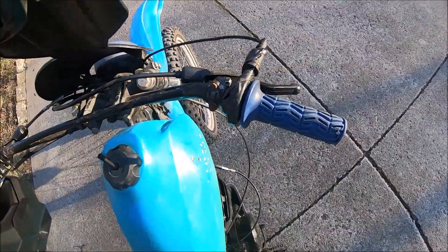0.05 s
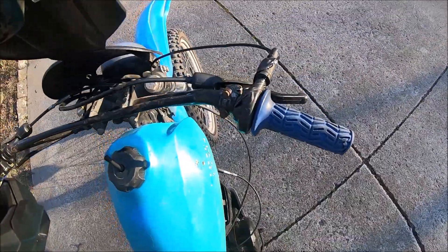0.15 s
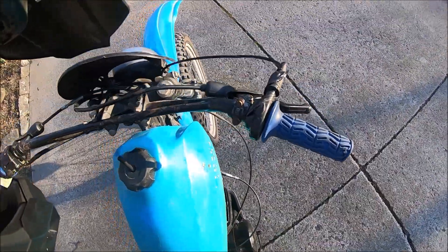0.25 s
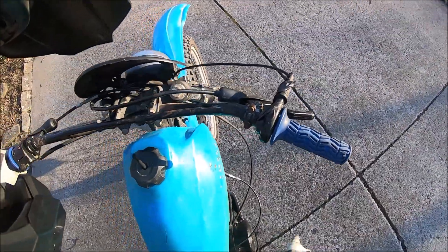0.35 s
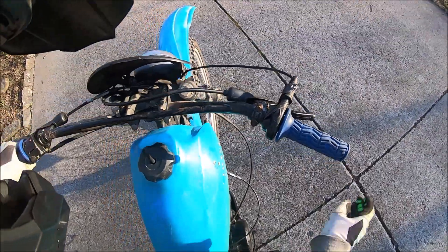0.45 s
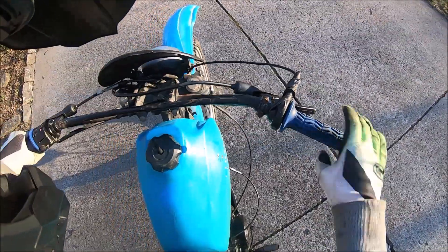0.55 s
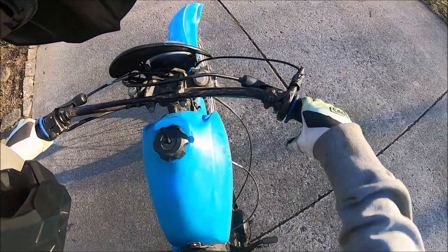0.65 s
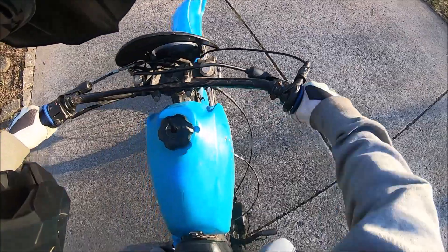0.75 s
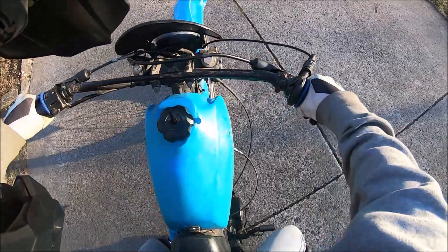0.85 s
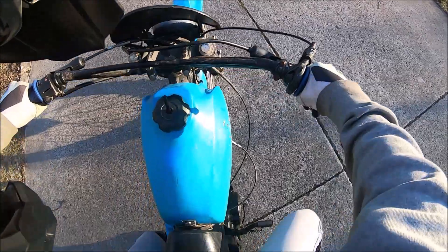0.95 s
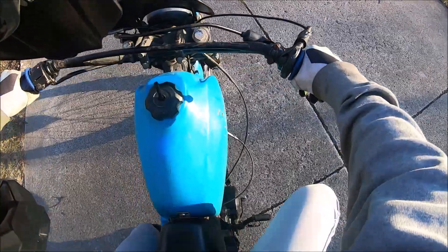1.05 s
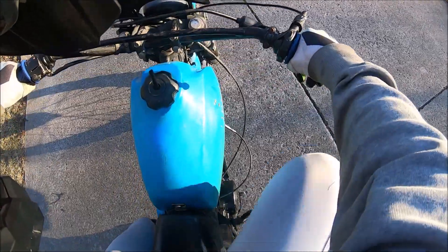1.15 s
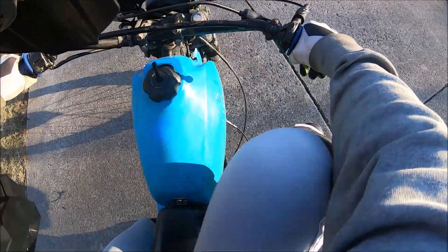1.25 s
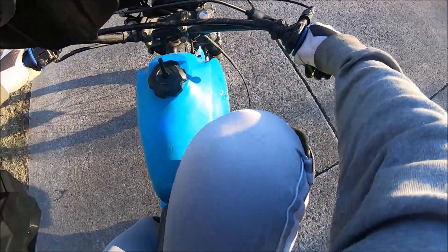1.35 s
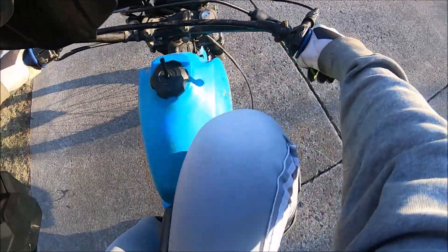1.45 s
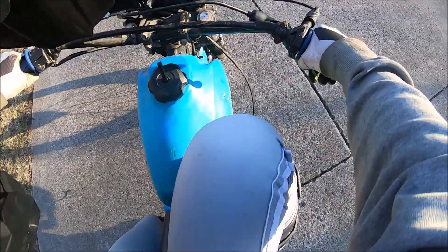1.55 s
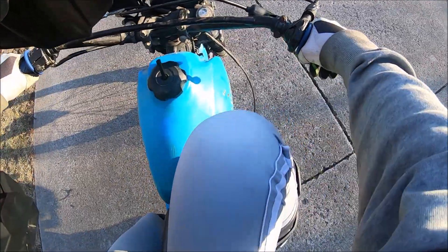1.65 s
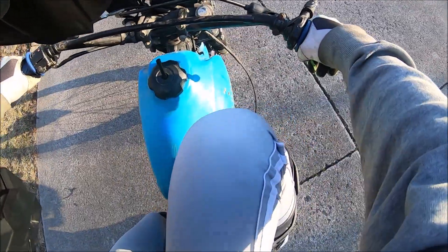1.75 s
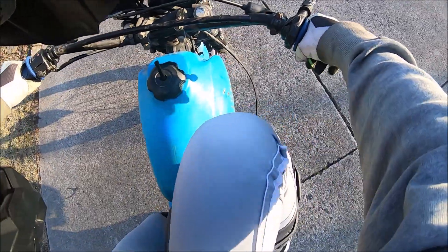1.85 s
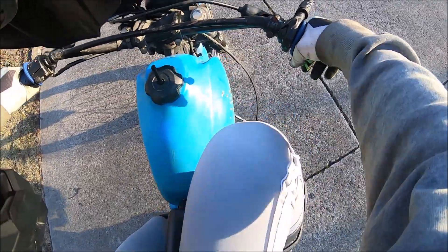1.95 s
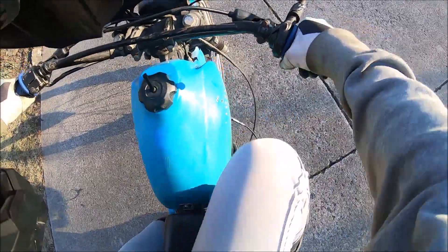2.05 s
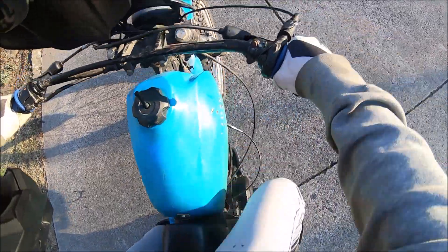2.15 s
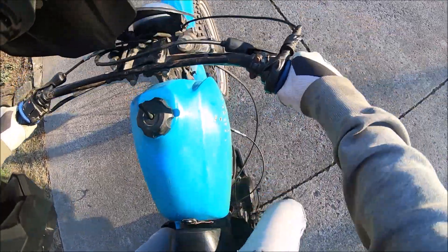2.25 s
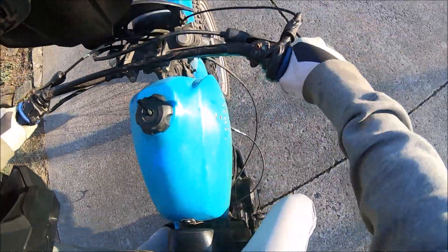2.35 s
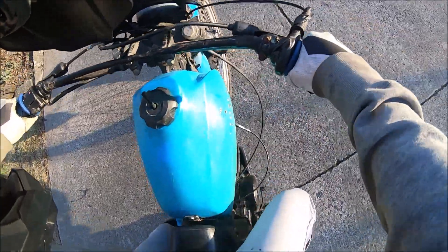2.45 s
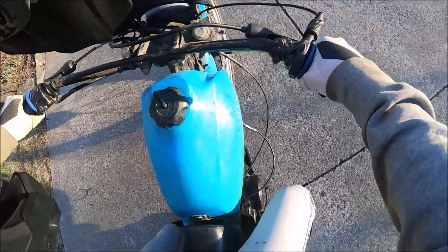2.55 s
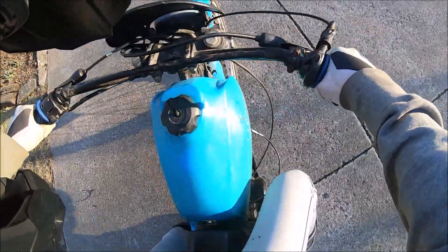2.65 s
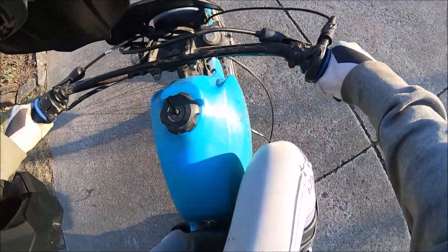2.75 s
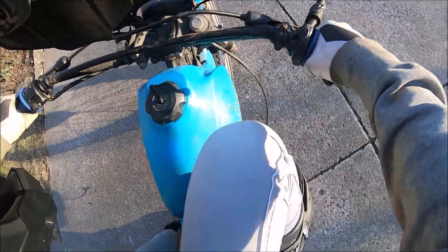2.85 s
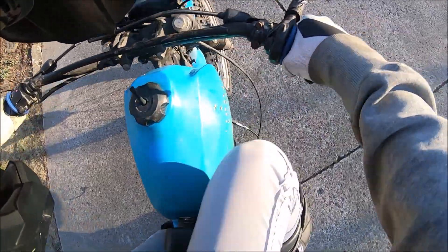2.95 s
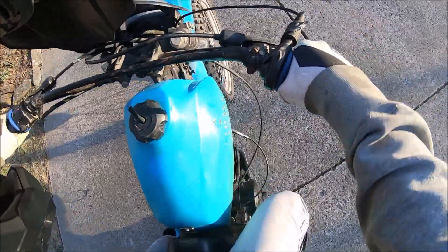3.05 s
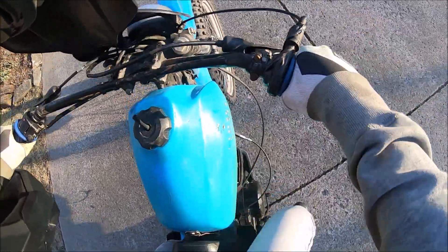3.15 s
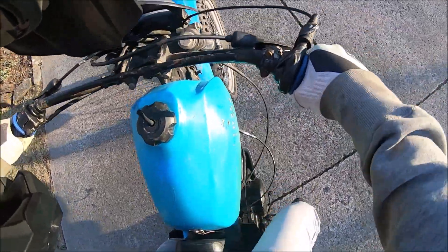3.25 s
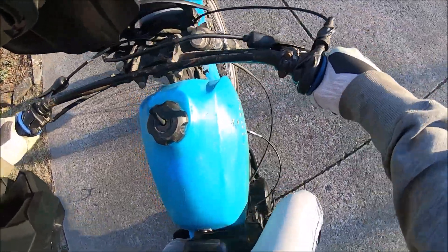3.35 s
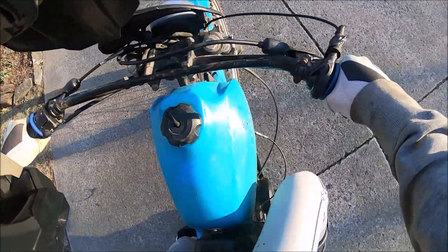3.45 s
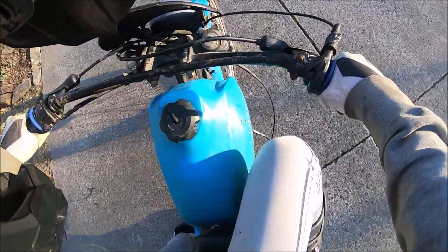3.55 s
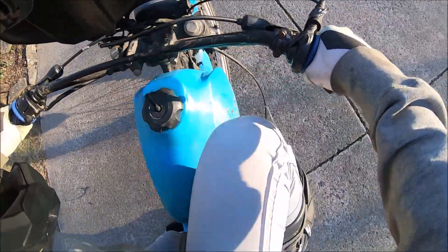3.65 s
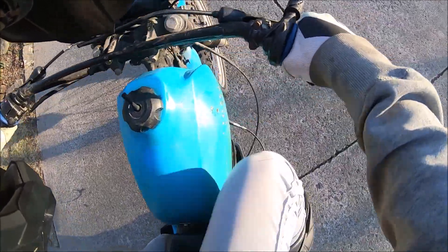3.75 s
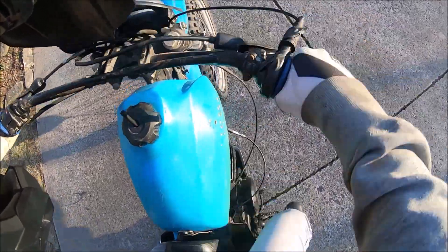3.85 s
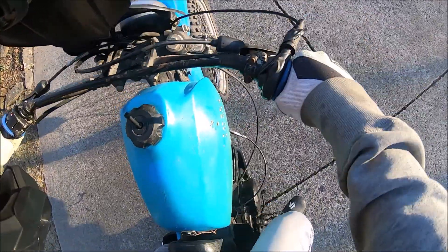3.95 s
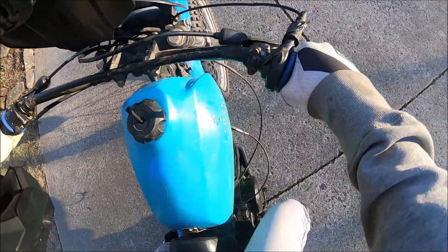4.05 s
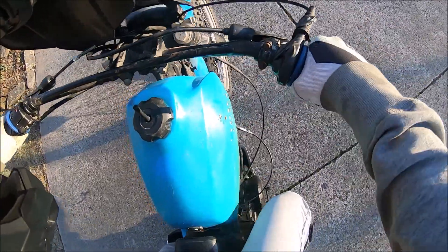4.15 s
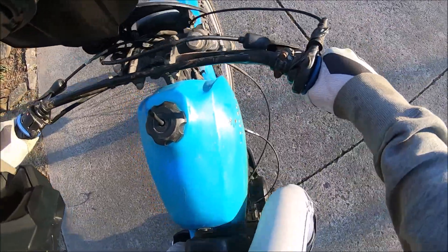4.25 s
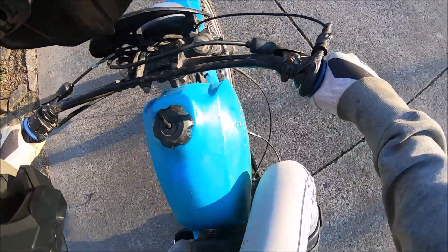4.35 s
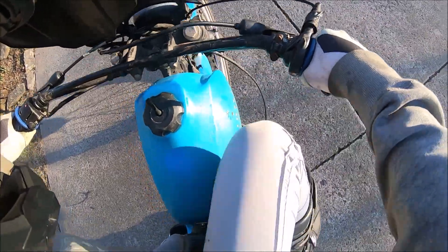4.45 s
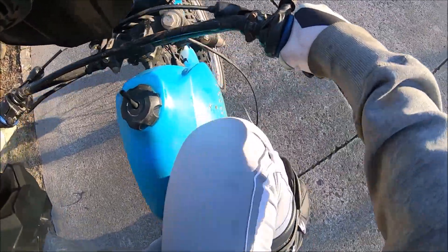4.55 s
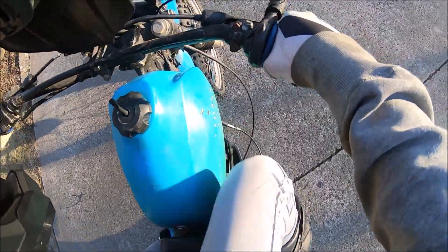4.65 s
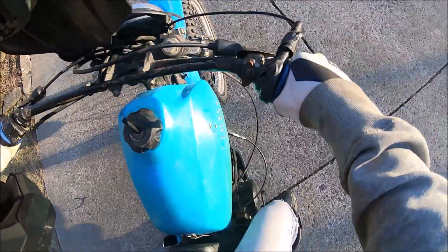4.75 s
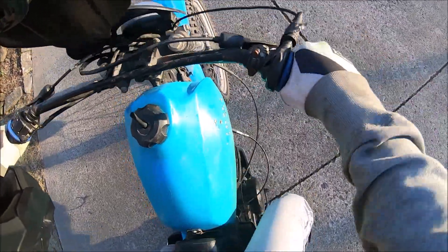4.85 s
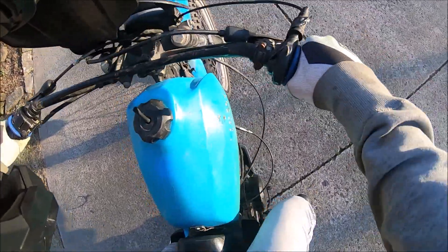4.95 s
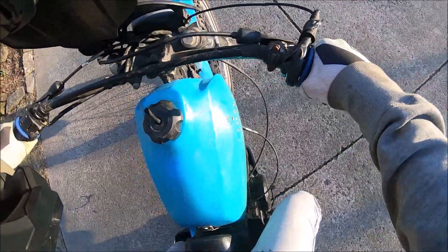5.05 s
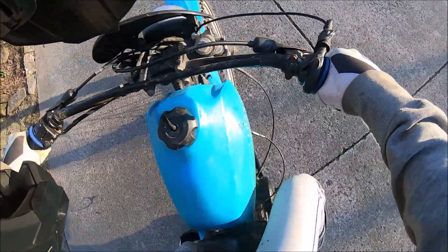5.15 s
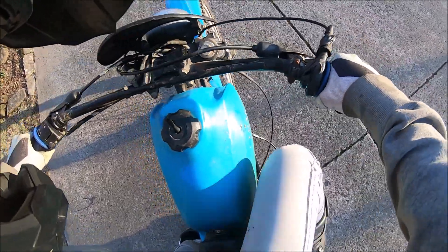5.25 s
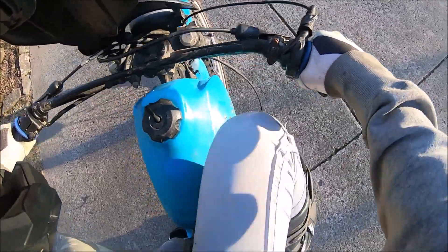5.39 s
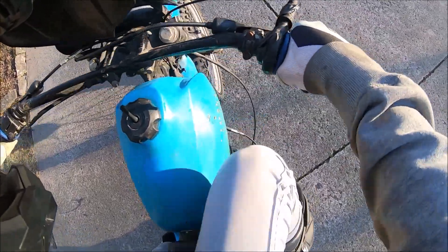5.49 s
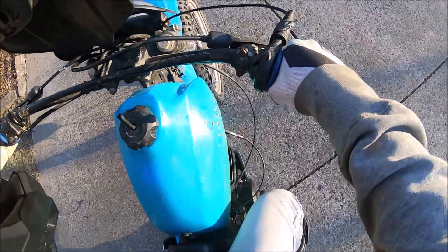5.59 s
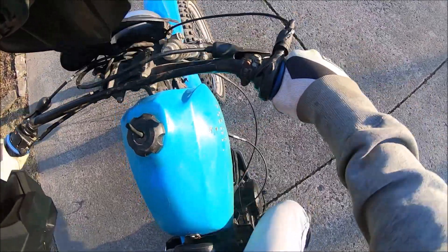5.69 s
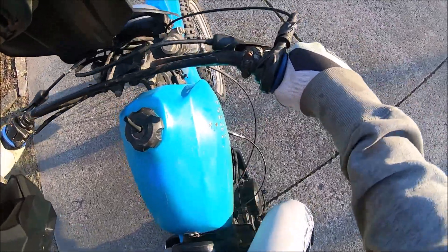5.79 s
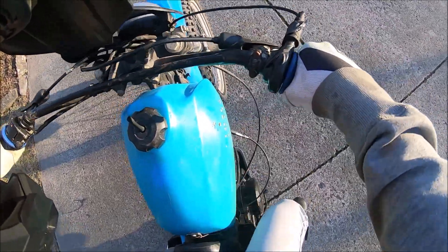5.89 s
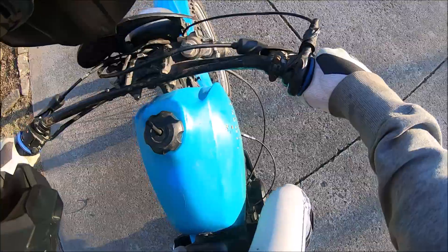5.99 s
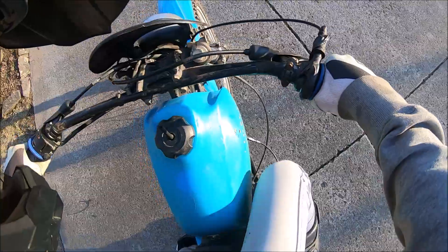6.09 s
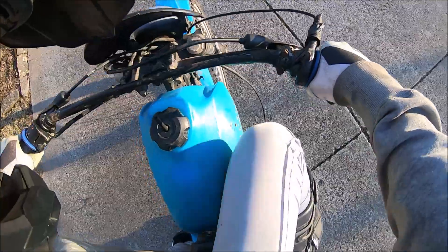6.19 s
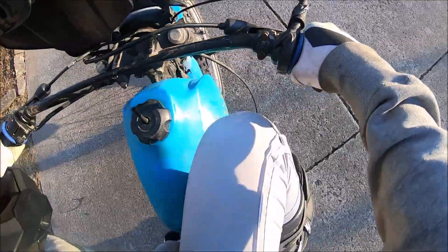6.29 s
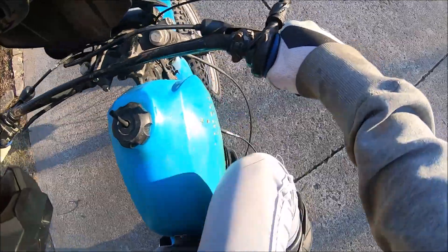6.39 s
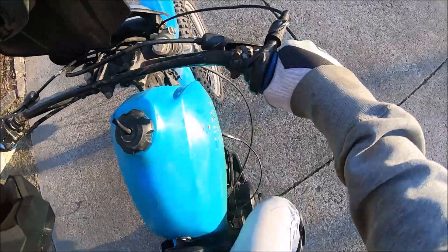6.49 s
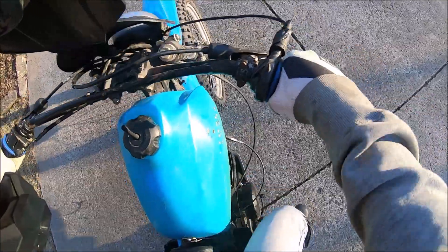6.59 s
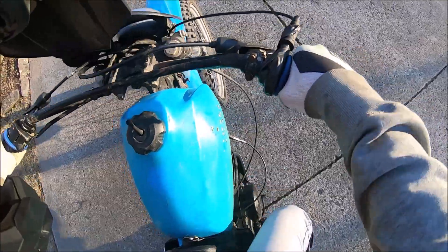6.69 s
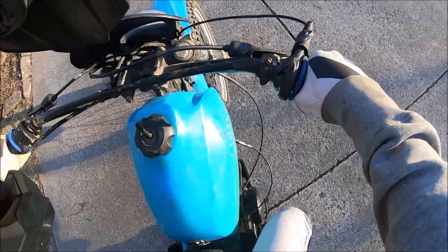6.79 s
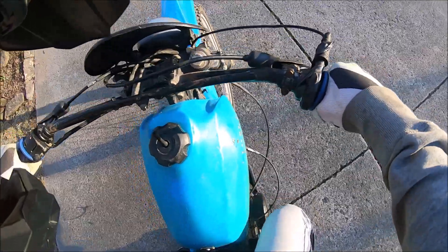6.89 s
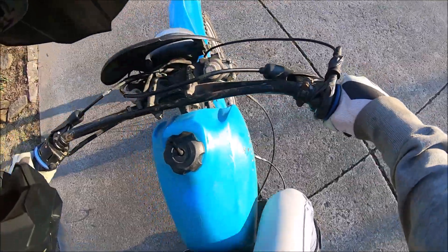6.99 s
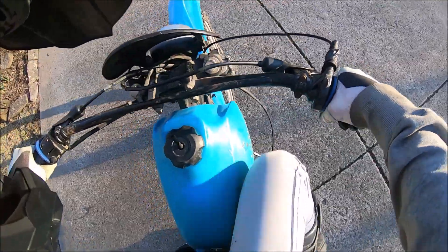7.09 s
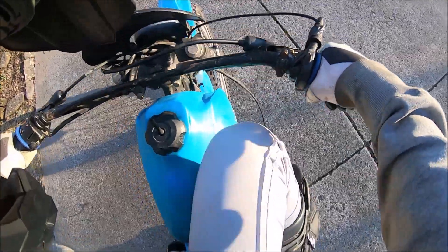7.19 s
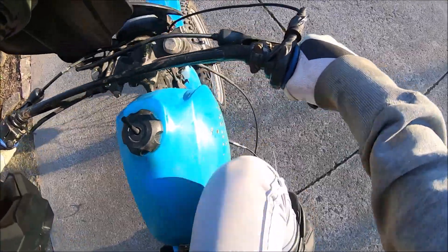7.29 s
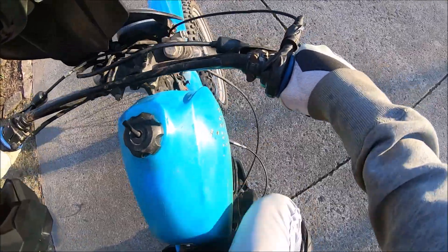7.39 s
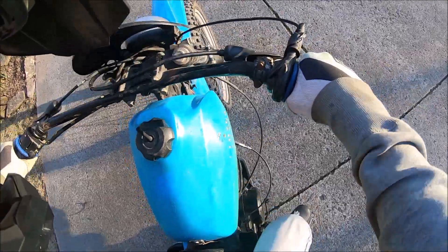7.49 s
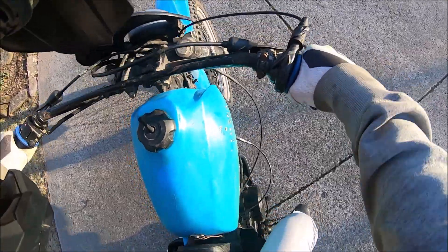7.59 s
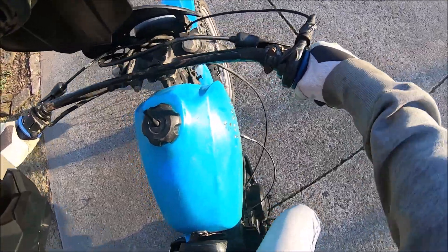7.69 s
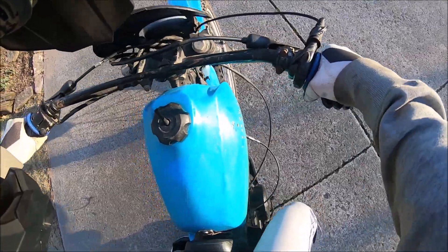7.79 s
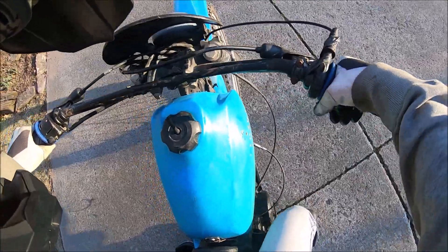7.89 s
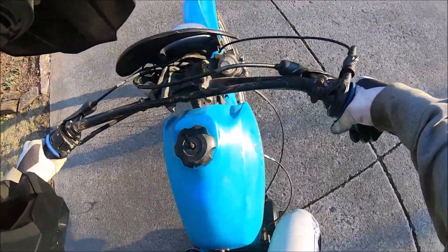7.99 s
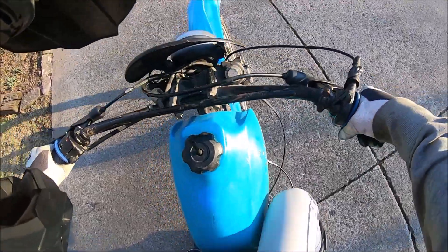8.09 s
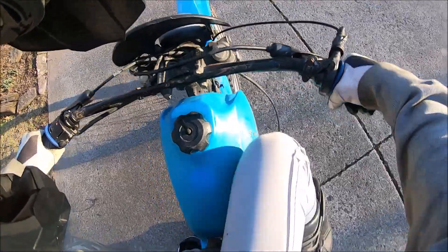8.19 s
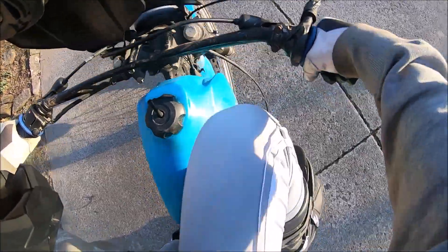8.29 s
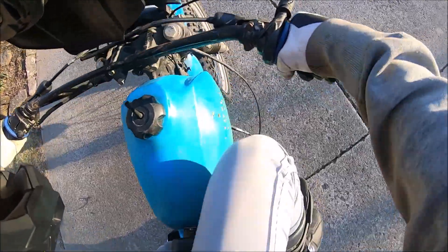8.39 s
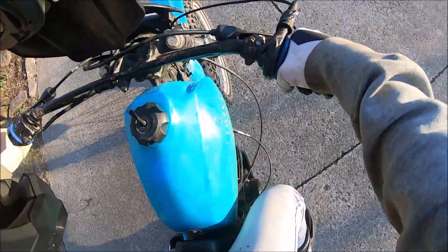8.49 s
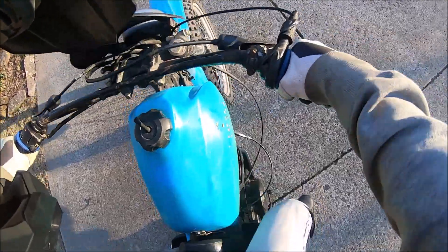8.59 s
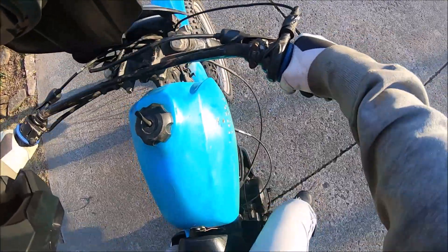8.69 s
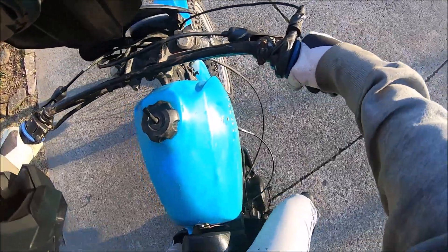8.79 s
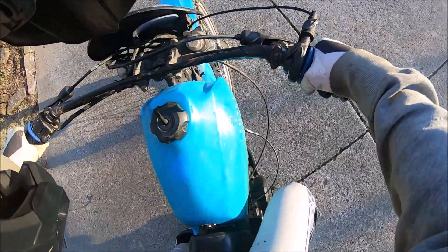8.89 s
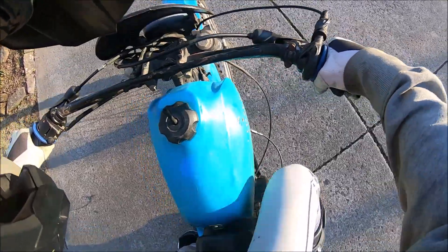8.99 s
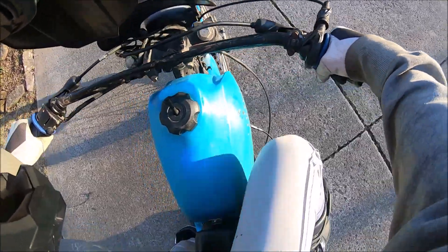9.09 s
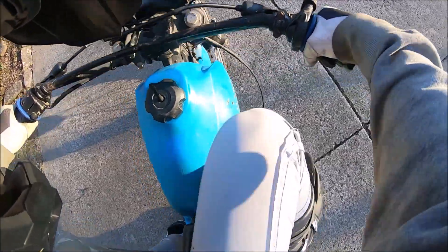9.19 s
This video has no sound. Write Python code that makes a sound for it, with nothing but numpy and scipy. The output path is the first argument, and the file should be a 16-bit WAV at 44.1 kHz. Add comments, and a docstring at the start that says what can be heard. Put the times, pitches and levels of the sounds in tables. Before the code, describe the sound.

Repeated kick-starter strokes on a two-stroke bike: gears clank and whirr, exhaust chuffs dully, lever slams, ratchet clicks back, engine never fires.

```python
"""A two-stroke dirt bike is kicked over eight times on a driveway and never catches: each turn of its crank
puffs damped modes through the exhaust and draws turbulent noise through the resonant intake.
Impacts ring the metal: gears engage and rattle, the lever clacks on its stop and ticks over its ratchet.
Sliding tones form a far bird and a squeal; shaped noise forms clothes, air, boot and a yard's reverberation."""
import sys
import numpy as np
from scipy import signal
from scipy.fft import rfft, irfft, next_fast_len
from scipy.io import wavfile
from scipy.ndimage import map_coordinates

SR = 44100
rng = np.random.default_rng(int(sys.argv[2]) if len(sys.argv) > 2 else 0)


def file_out(sig):
    """Save sig as 16-bit WAV at sys.argv[1]."""
    # one column per channel
    cols = np.atleast_2d(sig).T
    # limit, then scale
    lim = np.clip(cols, -1, 1)
    pcm = np.round(lim * 32767).astype(np.int16)
    wavfile.write(sys.argv[1], SR, pcm)


N = 407250  # samples in the scene
SIZE = 8192  # samples in one impact or body response
T = np.arange(SIZE) / SR
TOP_HZ = 15700  # upper band limit

# Levels in the tables are relative: each source adds its own offset.

# Rider settling on the bike [t/s, body level/dB, sleeve level/dB]
SETTLE = [(0.0, -50, -90), (0.37, -50.5, -65), (0.51, -47.5, -54), (0.81, -48, -47), (1.22, -40, -51.5),
          (1.42, -44.5, -55.5), (1.61, -49, -51), (1.72, -49, -64), (1.94, -51, -79), (2.1, -48, -60)]
# Spectra of sleeve, body and outdoor air [f/Hz, level/dB]
SLEEVE_TONE = [(180, -27), (300, -7.5), (1050, -10), (1220, -6), (1910, -20.5), (2800, -17), (5250, -32.5),
               (7850, -30), (14000, -51.5)]
BODY_TONE = [(12, -43), (20, -12), (54, -0.5), (123, -5), (156, -1), (203, -7.5), (400, -36.5), (520, -66),
             (880, -120)]
AIR_TONE = [(25, -10.5), (70, -6), (160, -8), (450, -14), (1170, -20.5), (1700, -21), (2500, -31.5),
            (3400, -35.5), (5000, -44.5), (10000, -49), (11500, -80.5), (15000, -81.5)]
# Left-right correlation of most noises, then of air and cloth [f/Hz, correlation]
ALIKE = [(25, .6), (70, 0.93), (350, 1), (700, 0.9), (2500, 0.79), (5000, 0.69), (9000, 0.092)]
ALIKE_AIR = [(60, 0.96), (180, 0.98), (550, 0.97), (1650, 0.3), (4970, 0.35), (15000, -0.0)]

# Loose knocks of bike, gears and rebounding lever [t/s, level/dB, thud level/dB, treble level/dB]
KNOCKS = [(0.053, -20, -8.5, -29), (1.543, -15, -7.5, -28.5), (1.942, -32.5, 5, -44), (2.245, -11, -9, -43),
          (2.36, -26.5, 5, -26), (2.385, -23, 6, -18), (3.165, -14.5, -14, -11), (3.339, -11.5, 0, -30.5),
          (4.11, -11, -10, -22), (4.134, -14, -20, -18.5), (4.89, -23, -3, -18), (4.973, -26.5, -17, -10),
          (5.756, -16, -11, -14), (6.657, -18, -2.5, -15), (6.76, -27, -9, -24),
          (6.787, -21.5, -4.5, -42.5), (6.879, -37, 6, -45), (7.659, -9, -3, -23.5),
          (7.693, -12.5, -31, -23.5), (8.709, -16.5, -12, -13.5), (8.739, -12, -3, -17),
          (8.852, -11.5, -19, -14), (8.89, -32, -27, 0), (8.928, -28.5, -1, -23), (9.012, -31.5, 3, -38)]
# Clanks against compression [lead before first puff/s, level/dB, thud level/dB, treble level/dB]
COMPRESSION = [(0.033, -13, -6.5, -33), (0.016, -13, -2.5, -24)]
ENGAGE_TREBLE_DB = -41  # against the engaging clank
# Spectra of gear clank, frame thud and bright edge [f/Hz, level/dB]
GEAR_TONE = [(550, 9.5), (800, 1.5), (1400, 0.5), (2400, -6.5), (3100, -5.5), (3900, -9.5), (4800, -19)]
THUD_TONE = [(60, -24.5), (130, -6.5), (260, -2), (400, -4.5), (600, -17.5), (900, -35)]
TREBLE_TONE = [(3500, -15.5), (4800, 8), (7500, 0), (10200, -12.5), (11500, -36), (15000, -24)]
# Resonances of the engine cases, then of small steel parts [f/Hz, width/Hz, level/dB]
CASES = [(725, 51, 9.5), (865, 143, 6.5), (1178, 85, 10.5), (1347, 62, 5), (1570, 360, 5), (1830, 94, 8),
         (2043, 66, 9), (2425, 160, 7), (2755, 100, 7.5), (3096, 130, 7.5), (3646, 130, 2.5)]
SMALL_PARTS = [(4880, 200, 0.5), (5870, 250, 1.5), (7350, 280, 4), (9200, 180, 11.5)]

# Glove creaking on the rubber grip (start t/s, end t/s, level/dB)
CREAK = (0.94, 1.125, -58.5)
# Spectrum of the grip [f/Hz, level/dB]
RUBBER_TONE = [(1500, -7), (2800, 3), (4200, -7), (5500, -14), (8500, -7), (10500, -14), (12000, -38)]
# Falling squeal [t/s, pitch f/Hz, strongest partial f/Hz, level/dB]
SQUEAL = [(1.11, 563, 2300, -75), (1.135, 610, 2430, -51), (1.17, 583, 2330, -64), (1.23, 530, 2090, -54),
          (1.33, 495, 1860, -50), (1.43, 482, 1490, -48.5), (1.49, 444, 1340, -51.5),
          (1.53, 437, 1300, -64)]
# Bird phrases [t/s, level/dB]
PHRASES = [(1.77, -59.5), (2.72, -61.5), (3.675, -59)]
# Three sliding notes of a phrase, each with rows [t into the phrase/s, f/Hz, level/dB]
NOTES = [
    [(0, 5950, -3), (.012, 5560, -5), (.03, 4280, -6), (.07, 4000, 0), (.085, 3970, -25)],
    [(.05, 5200, -16), (.075, 4600, -7), (.105, 4150, -14)],
    [(.09, 3760, -17), (.11, 3600, -7.5), (.22, 3340, -0.5), (.3, 2910, 5.5), (.34, 2880, 9.5),
     (.365, 2760, 14)],
]

# One row a kick [gear engages t/s, clank level/dB, thud level/dB, compression level/dB,
# rumble level/dB, whirr level/dB, first gasp lag/s, first gasp level/dB]
KICKS = [(2.143, -21.5, 3, 0, -34, -32, 0.05, -25), (3.039, -11.5, -4.5, 2, -35.5, -32.5, 0.029, -23),
         (3.834, -11.5, -6, 2, -36, -33, 0.048, -22.5), (4.666, -20, 1, -1.5, -35.5, -29.5, 0.045, -32),
         (5.56, -15, -2, -1.5, -35.5, -31, 0.015, -30), (6.438, -16.5, -3.5, -2, -34, -31, 0.016, -32.5),
         (7.358, -14, -3, 1.5, -34, -31.5, 0.014, -33), (8.428, -14.5, -9, 1, -32.5, -29.5, 0.018, -36.5)]
# Spectra of gear rumble and whirr [f/Hz, level/dB]
RUMBLE_TONE = [(40, 0), (100, -5.5), (170, -8.5), (265, 0), (390, -5), (550, -12), (720, -12.5),
               (1100, -19.5), (2500, -44.5)]
WHIRR_TONE = [(500, -0.5), (800, -2), (1400, 4.5), (2000, -1), (3200, -1), (4500, -8), (7500, -14),
              (10200, -18.5), (11500, -34), (15000, -41.5)]
# Gear noise (rise from engagement to stop/dB, sag from stop to stall/dB)
RUMBLE_SWING = (4.8, 7.4)
WHIRR_SWING = (15.2, 8)
BITE_S = 0.008  # the gear noise sets in over this time
EBB_LEAD_S, EBB_S, EBB_DB = 0.053, 0.026, 4.5  # whirr ebb: start before a puff, width at half depth, depth

GASP_LAG_S, GASP_S = 0.022, 0.028  # gasp after its puff, and its width at half height
# Spectrum of the intake [f/Hz, level/dB]
INTAKE_TONE = [(500, -9), (1000, -5), (1700, -14.5), (1980, -17), (2500, -2), (3000, -5), (4200, -11.5),
               (4900, -21), (5800, -15), (8200, -31), (10000, -23.5), (11500, -52.5), (15000, -47.5)]
# Resonances of the intake tract [f/Hz, width/Hz, level/dB]
TRACT = [(1106, 52, 2.5), (1424, 110, 10.5), (1760, 110, 14.5), (2110, 88, 11), (2793, 150, 5),
         (3110, 110, 4), (3950, 300, 1.5), (5600, 48, 4), (6620, 130, 9.5), (7200, 110, 10.5),
         (10220, 320, 0.5)]

# Full turns of the crank [puff t/s, boom level/dB, bark level/dB, following gasp level/dB]
PUFFS = [(2.276, -21, -15, -32), (2.382, -22, -28, -41.5), (3.144, -19, -17.5, -33), (3.234, -22, -27, -29),
         (3.945, -21, -17, -31), (4.024, -23, -25, -25), (4.793, -21.5, -17.5, -24),
         (5.661, -21.5, -18.5, -18.5), (6.549, -22, -17.5, -19), (7.469, -22, -17.5, -16.5),
         (7.564, -21.5, -20.5, -21.5), (7.668, -25, -22.5, -44), (8.548, -21.5, -15, -19),
         (8.638, -18.5, -33, -25.5), (8.709, -18.5, -18.7, -18.5), (8.779, -24, -18.5, -19),
         (8.872, -24, -20.5, -24.5)]
# Compression halting the crank with a weak puff [t/s, boom level/dB, bark level/dB, run-down t60/s]
STALLS = [(2.425, -52, -49, 0.56), (3.347, -31.5, -31, 0.48), (4.116, -36, -31, 0.32),
          (4.89, -34, -35, 1.15), (5.788, -35.4, -36.5, 1.0), (6.681, -36, -31.5, 0.88),
          (7.776, -52, -36, 0.12), (8.965, -35, -30, 0.23)]
# Modes of the exhaust chamber, then of the pipe [f/Hz, level/dB, t60/s]
CHAMBER = [(48, -37.5, 0.043), (95.2, -5.5, 0.13)]
PIPE = [(182, -4.5, 0.027), (237, 1, 0.079), (263.8, 3, 0.092), (307, -19.5, .045), (393, 1.5, 0.081),
        (474, -7, 0.033), (501, -8, 0.11), (672, -6.5, 0.034)]

# Lever hitting its stop [t/s, level/dB, thud level/dB, treble level/dB, change of main clang/dB]
STOPS = [(2.3002, 1, -1.5, 3, -0.5), (3.1748, 0, -1, -4.5, -1.5), (3.9526, -1, -12, 1.5, -6.5),
         (4.8297, 0.5, -1, -2.5, -4.5), (5.7057, 0, -2, 2, -7.5), (6.5978, -3, -1, -8, 7),
         (7.5248, -2.5, 0.5, -23, 10.5), (8.616, -3, 0.5, 0, 8)]
# Spectrum of the stop [f/Hz, level/dB]
STOP_TONE = [(150, -9), (400, -14.5), (600, -8), (1500, 5), (3000, -1.5), (4500, -1), (6000, -14),
             (8000, -13), (10300, -20), (11500, -32), (15000, -35.5)]
# Resonances of lever and cases [f/Hz, width/Hz, level/dB]
LEVER = [(710, 67, 11.5), (969, 42, 9.5), (1218, 39, 7.5), (1349, 140, 18), (1680, 41, 4), (1840, 150, 7),
         (2220, 140, 9), (2320, 110, 3.5), (2590, 56, 10), (2960, 100, 7), (3580, 530, 13.5),
         (4250, 120, 6), (5110, 320, -9.5), (7060, 190, 15), (9020, 740, 7)]
CLATTER_PER_S = 30  # mean rate of free-tooth impacts
CLATTER_DB, CLATTER_SPREAD_DB = 4, 21.5  # loudest tooth over the whirr setting, and random range below it
CLATTER_THUD_DB, CLATTER_TREBLE_DB = -9.5, -14.5  # against each tooth's clank
RATTLE_ON, RATTLE_FADE_DB = 0.28, 23  # share of the run-down t60 with rattle, and total fade by its end

# Lever returning over its ratchet [first tick t/s, first gap/s, gap ratio, ticks, level/dB]
RETURNS = [(2.732, 0.064, 1.33, 3, -24), (3.565, 0.092, 1.2, 2, -26.5), (4.414, 0.078, 1.41, 3, -25.5),
           (5.252, 0.076, 1.27, 3, -26.5), (6.139, 0.07, 1.43, 3, -24.5), (7.063, 0.08, 1.24, 3, -24),
           (8.115, 0.061, 1.206, 4, -21.5), (9.148, 0.069, 1.3, 1, -27.5)]
# First to fourth tick of a return [level/dB]
TOOTH_DB = [1, 1, -1.3, -1.5]
# Spectrum of the pawl [f/Hz, level/dB]
PAWL_TONE = [(400, -7), (720, 2), (1020, -0.5), (1500, -0.5), (2000, -4), (3000, -4), (4600, -9.5),
             (7000, -15), (10000, -23), (11500, -42.5), (15000, -44)]
# Resonances of the ratchet wheel [f/Hz, width/Hz, level/dB]
WHEEL = [(700, 63, 8.5), (1295, 77, 7), (1673, 110, 12.5), (2090, 68.5, 6), (3110, 230, 9),
         (4140, 130, 3.5), (6220, 150, 4), (8900, 300, 1)]
# Lever snapping against its upper stop [t/s, level/dB]
CLINKS = [(5.099, -16), (5.12, -18), (7.977, -15.5)]
# Spectrum of a clink [f/Hz, level/dB]
CLINK_TONE = [(400, -9), (800, -8.5), (1500, 0.5), (2000, -13.5), (2800, -0.5), (3400, -11), (4500, -3.5),
              (5600, -19), (7000, -16.5), (9800, -28.5), (13000, -46.5)]
# Resonances of a clink [f/Hz, width/Hz, level/dB]
CLINK_RING = [(1300, 76, 15.5), (1860, 110, 13), (2310, 220, 11.5), (4620, 250, -1.5), (7500, 170, 5.5),
              (7700, 130, 9), (9140, 400, 15.5)]

# Loose metal ringing after a jolt [t/s, level/dB]
AFTER_RINGS = [(3.35, -40.5), (5.8, -46.5), (6.8, -56)]
# Modes of the loose metal [f/Hz, level/dB, t60/s]
LOOSE_METAL = [(670, 2, 0.46), (1610, -5, 0.52)]
# Return spring singing [t/s, width at half height/s, level/dB]
SINGS = [(4.07, .09, -52), (4.879, 0.17, -54), (5.816, 0.085, -49)]
# Tones of the spring [f/Hz, level/dB]
SPRING = [(5730, 5.5), (7700, 2.5), (10420, -7)]
# Boot scraping on the lever [t/s, level/dB]
SCRAPE = [(8.16, -60), (8.19, -48), (8.24, -37), (8.31, -48), (8.39, -57)]
# Spectrum of the sole [f/Hz, level/dB]
SOLE_TONE = [(300, 5), (900, 10.5), (1900, -1.5), (2350, 10), (2700, -13), (6000, -14), (10000, -27)]
# Reverberation of the yard [f/Hz, t60/s]
YARD = [(100, 0.25), (400, 0.32), (1500, 0.98), (4000, 0.85), (10000, 0.19)]


def amp(db):
    """Logarithmic level: decibels to amplitude gain."""
    return 10 ** (np.asarray(db) / 20)


def unit(x):
    """Normalisation: scale to rms 1."""
    return x / np.sqrt(np.mean(x ** 2) + 1e-20)


def decay(t, t60):
    """Exponential damping: a fall of 60 dB in t60 seconds."""
    return np.exp(-np.log(1000) * t / t60)


def along(points, hz):
    """Interpolation of (f/Hz, value) points on a logarithmic frequency axis."""
    f, v = np.transpose(points)
    return np.interp(np.log(hz + 1), np.log(f + 1), v)


def colour(points, hz):
    """Spectral shaping: a gain that falls away steeply beyond its end points."""
    below = (hz + 1) / points[0][0]
    above = points[-1][0] / (hz + 1)
    inside = np.minimum(1, np.minimum(below, above))
    return amp(along(points, hz)) * inside ** 4


def glide(rows):
    """Linear interpolation of each column, sample by sample from the first row's time to the last."""
    s, *cols = np.transpose(rows)
    t = np.arange(s[0], s[-1], 1 / SR)
    return [np.interp(t, s, c) for c in cols]


def add(track, s, x):
    """Superposition: mix x into the track at time s."""
    i = max(0, round(s * SR))
    track[:, i:i + x.shape[-1]] += x[..., :max(0, N - i)]


def gains(rows):
    """Amplitude envelopes: one gain track for each dB column, silent outside the rows."""
    levels = np.array(glide(rows))
    out = np.zeros((len(levels), N))
    add(out, rows[0][0], amp(levels))
    return out


def wobble(rate, size=N):
    """Smooth random modulation: spline through rate random knots a second."""
    knots = rng.standard_normal(int(size * rate / SR) + 4)
    return map_coordinates(knots, [np.arange(size) * rate / SR])


def swell(length, edge):
    """Raised-sine envelope, length seconds wide at half height."""
    t = np.arange(int((length + edge) * SR)) / SR
    nearest_end = np.minimum(t, length + edge - t)
    return np.sin(np.pi / 2 * np.clip(nearest_end / edge, 0, 1)) ** 2


def noise(size, spectrum=None, alike=ALIKE):
    """Partially coherent stereo noise of rms 1: mid and side set the left-right correlation."""
    m = next_fast_len(size)
    hz = np.fft.rfftfreq(m, 1 / SR)
    turn = np.arccos(np.clip(along(alike, hz), -1, 1)) / 2
    shape = colour(spectrum, hz) if spectrum is not None else 1
    white = rfft(rng.standard_normal((2, m)))
    mid, side = irfft(white * shape * [np.cos(turn), np.sin(turn)], m)[:, :size]
    return unit(np.array([mid + side, mid - side]))


def resonator(spectrum, peaks=()):
    """Minimum-phase response: a broad spectrum with resonances, made causal by cepstral folding."""
    hz = np.fft.rfftfreq(SIZE, 1 / SR)
    peaks_db = sum(db / (1 + (2 * (hz - f) / w) ** 2) for f, w, db in peaks)
    gain = colour(spectrum, hz) * amp(peaks_db)
    cepstrum = irfft(np.log(gain + 1e-6))
    cepstrum[1:SIZE // 2] *= 2
    cepstrum[SIZE // 2 + 1:] = 0
    return np.exp(rfft(cepstrum))


def rung(x, body):
    """Linear filtering: a short excitation passed through a body."""
    return irfft(rfft(x, SIZE) * body)


def restruck(peaks, scatter_db):
    """Varying modal excitation: the same resonances at new random strengths."""
    return [(hz, width, db + scatter_db * rng.normal()) for hz, width, db in peaks]


def blow(body, t60, rise):
    """Impact excitation: a dying chatter of contacts rings a body; rms 1 if packed into 10 ms."""
    chatter = noise(SIZE) * decay(T, t60) * (1 - np.exp(-T / rise))
    return unit(rung(chatter, body)) * np.sqrt(SR / 100 / SIZE)


def ring(modes, rise, scatter_db):
    """Modal synthesis: damped sines with scattered pitch and level; rms 1 if packed into 35 ms."""
    x = 0
    for hz, db, t60 in modes:
        strength = amp(db + scatter_db * rng.normal())
        mode_hz = hz * (1 + 0.015 * rng.normal())
        x = x + strength * decay(T, t60) * np.sin(2 * np.pi * mode_hz * T)
    return unit(x * (1 - np.exp(-T / rise))) * np.sqrt(.035 * SR / SIZE)


def clanks(hits):
    """Impact radiation: steel rings the cases with changing colour, thuds the frame and adds a bright edge."""
    out, frame, edge = np.zeros((2, N)), resonator(THUD_TONE), resonator(TREBLE_TONE, SMALL_PARTS)
    for s, db, thud_db, treble_db in hits:
        cases = resonator(GEAR_TONE, restruck(CASES, scatter_db=5.5))
        life = np.interp(thud_db, [-25, -3], [.04, .075])  # loaded gears chatter longer
        add(out, s - .003, amp(db - 10.0) * blow(cases, t60=life, rise=0.003))
        add(out, s + 0.00099, amp(db + min(thud_db, 3) - 6) * blow(frame, t60=0.082, rise=0.0046))
        add(out, s - .002, amp(db + treble_db - 3.5) * blow(edge, t60=0.048, rise=.003))
    return out


def surroundings():
    """Broadband noise: outdoor air throughout, and the rider's modulated body and sleeve before the first kick."""
    body, sleeve = gains(SETTLE)
    air = amp(-48.5 + 1.2 * wobble(5)) * noise(N, AIR_TONE, ALIKE_AIR)
    bumps = body * amp(2.0 + 1.3 * wobble(13.0)) * noise(N, BODY_TONE)
    rustle = amp(-1.5 + 0.69 * wobble(12.44) + 1.5 * wobble(120))
    cloth = sleeve * rustle * noise(N, SLEEVE_TONE, ALIKE_AIR)
    return air + bumps + cloth


def knocks():
    """Impact excitation: gears engage, then clank twice against compression; loose parts also knock."""
    hits = list(KNOCKS)
    for engage, db, thud_db, force_db, *_ in KICKS:
        first_puff = min(s for s, *_ in PUFFS if s > engage)
        hits.append((engage, db, thud_db, ENGAGE_TREBLE_DB))
        hits += [(first_puff - lead, clank_db + force_db, *tone) for lead, clank_db, *tone in COMPRESSION]
    return clanks(hits)


def glove():
    """Stick-slip friction: the glove releases on the grip in 14 unevenly spaced steps."""
    out, rubber = np.zeros((2, N)), resonator(RUBBER_TONE)
    start, end, db = CREAK
    for s in np.linspace(start, end, 14):
        slip_s = s + 0.0025 * rng.normal()
        add(out, slip_s, amp(db + 3 * rng.normal()) * blow(rubber, t60=.012, rise=0.00042))
    return out


def squeal():
    """Harmonic synthesis: a thin, wavering tone whose strongest partial sinks as its pitch falls."""
    out = np.zeros((2, N))
    pitch, centre, db = glide(SQUEAL)
    phase = 2 * np.pi * np.cumsum(pitch * (1 + 0.0074 * wobble(69.4, size=len(pitch)))) / SR
    for k in range(2, 7):
        moving_peak = 1.0 / np.hypot(1, (k * pitch - centre) / 150)
        fixed_peak = 0.12 / np.hypot(1, (k * pitch - 2550) / 130)
        weight = 1.0 / k ** 2 + moving_peak + fixed_peak
        level = amp(db + 2.1 * wobble(89, size=len(db)))
        add(out, SQUEAL[0][0], level * weight * np.sin(k * phase))
    return out


def bird():
    """Frequency modulation: each phrase is two quick plunging whistles and one long slide."""
    out = np.zeros((2, N))
    for s, db in PHRASES:
        for note in NOTES:
            hz, level = glide(note)
            phase = 2 * np.pi * np.cumsum(hz * (1 + 0.0048 * wobble(120, size=len(hz)))) / SR
            loudness = amp(db + level - 2.0 + 4 * wobble(47, size=len(hz)))
            add(out, s + note[0][0], loudness * np.sin(phase))
    return out


def spin(engage, stop, stall, t60, swing):
    """Rotational energy: gear noise grows under the foot, sags as the crank coasts and dies after the stall."""
    t = engage + np.arange(SR) / SR
    rise_db, sag_db = swing
    level = amp(np.interp(t, [engage, stop, stall], [-rise_db, 0, -sag_db]))
    return level * np.minimum(1, (t - engage) / BITE_S) * decay(np.maximum(0, t - stall), t60)


def gears():
    """Gear-mesh noise: the spinning train rumbles while single teeth rattle the cases, then runs down."""
    rumble, whirr, ebb = np.zeros((3, 1, N))
    for s, *_ in PUFFS + STALLS:  # compression slows the gears
        add(ebb, s - EBB_LEAD_S, swell(EBB_S, edge=EBB_S / 2))
    for kick, (stop, *_), (stall, *_, t60) in zip(KICKS, STOPS, STALLS):
        engage, *_, rumble_db, whirr_db, _, _ = kick
        add(rumble, engage, amp(rumble_db) * spin(engage, stop, stall, t60, RUMBLE_SWING))
        add(whirr, engage, amp(whirr_db) * spin(engage, stop, stall, t60, WHIRR_SWING))
    low = unit(noise(N, RUMBLE_TONE) * amp(2.6 * wobble(60)))
    contacts = (rng.random(N) < 70 / SR) * rng.uniform(.3, 1, N)  # 70 a second on average
    rattle = unit(signal.fftconvolve(contacts, decay(T, 0.027))[:N])
    teeth = noise(N) * (0.5 + rattle) * amp(1.7 * wobble(600))
    softened = [(hz, width, 0.81 * db) for hz, width, db in CASES + SMALL_PARTS]
    cases = irfft(resonator(WHIRR_TONE, softened))
    high = unit(signal.fftconvolve(teeth, cases[None], axes=1)[:, :N])
    return amp(6.0) * rumble * low + amp(-1.0 - EBB_DB * ebb) * whirr * high


def intake():
    """Turbulent flow through a resonant tract: the piston gasps as a kick begins and after every full puff."""
    out, shape = np.zeros((2, N)), swell(GASP_S, edge=0.025)
    gasps = [(s + lag, db) for s, *_, lag, db in KICKS]
    gasps += [(s + GASP_LAG_S, db) for s, _, _, db in PUFFS]
    for s, db in gasps:
        flutter = amp(2.0 * wobble(341, size=SIZE)[:len(shape)])
        flow = shape * flutter * noise(SIZE)[:, :len(shape)]
        tract = resonator(INTAKE_TONE, restruck(TRACT, scatter_db=6.5))
        add(out, s - .006, amp(db - 4.5) * unit(rung(flow, tract)) * np.sqrt(GASP_S * SR / SIZE))
    return out


def exhaust():
    """Cavity and pipe resonance: unburnt charge booms in the chamber and barks in the pipe; stalls puff weakly."""
    out, thud = np.zeros((2, N)), resonator(THUD_TONE)
    for s, boom_db, bark_db, _ in PUFFS + STALLS:
        add(out, s - .001, amp(boom_db + 1.5) * ring(CHAMBER, rise=0.0032, scatter_db=1.0))
        add(out, s + 0.0023, amp(bark_db - 2.0) * ring(PIPE, rise=0.0014, scatter_db=2.0))
        add(out, s - .006, amp(bark_db - 0.5) * blow(thud, t60=0.084, rise=0.018))  # turbulence at the port
    return out


def lever_stop():
    """Impact excitation: the steel lever slams on its stop at the bottom of the stroke and jolts the frame."""
    out, frame, edge = np.zeros((2, N)), resonator(THUD_TONE), resonator(TREBLE_TONE, SMALL_PARTS)
    for s, db, thud_db, treble_db, clang_db in STOPS:
        steel = resonator(STOP_TONE, list(LEVER) + [(1400, 500, clang_db)])
        add(out, s - .0005, amp(db - 12.0) * blow(steel, t60=0.025, rise=0.0007))
        add(out, s + 0.0018, amp(db + thud_db - 16.5) * blow(frame, t60=0.069, rise=0.0015))
        add(out, s, amp(db + treble_db - 33.0) * blow(edge, t60=0.021, rise=.0003))
    return out


def clatter():
    """Random impacts: unloaded teeth rattle after the lever's stop and fade soon after the crank stalls."""
    hits = []
    for (*_, whirr_db, _, _), (stop, *_), (stall, *_, t60) in zip(KICKS, STOPS, STALLS):
        slots = np.arange(1, 21)  # at most 20 impacts a kick
        times = stop + (slots + rng.uniform(-.5, .5, len(slots))) / CLATTER_PER_S
        levels = whirr_db + CLATTER_DB - CLATTER_SPREAD_DB * rng.random(len(slots))
        end = stall + RATTLE_ON * t60
        levels = levels - np.interp(times, [stop, stall, end], [0, WHIRR_SWING[1], RATTLE_FADE_DB])
        hits += [(s, db, CLATTER_THUD_DB, CLATTER_TREBLE_DB) for s, db in zip(times, levels) if s < end]
    return clanks(hits)


def ratchet():
    """Slide and impact: the pawl climbs each tooth and drops, ever slower; the lever also clinks on its upper stop."""
    out, pawl, home = np.zeros((2, N)), resonator(PAWL_TONE, WHEEL), resonator(CLINK_TONE, CLINK_RING)
    for s, gap, slowing, ticks, db in RETURNS:
        for k, tooth_db in enumerate(TOOTH_DB[:round(ticks)]):
            add(out, s - .007, amp(db + tooth_db - 24.0) * blow(pawl, t60=.05, rise=.004))  # slide
            add(out, s - .001, amp(db + tooth_db - 10.5) * blow(pawl, t60=0.062, rise=0.00046))  # drop
            s += gap * slowing ** k
    for s, db in CLINKS:
        add(out, s - .001, amp(db - 8) * blow(home, t60=0.042, rise=0.0019))
    return out


def after_ring():
    """Free vibration: a jolt leaves loose metal on the bike ringing faintly."""
    out, t = np.zeros((2, N)), np.arange(SR // 2) / SR
    for s, db in AFTER_RINGS:
        for hz, level, t60 in LOOSE_METAL:
            tone = np.sin(2 * np.pi * hz * t + .5 * wobble(40, size=len(t)))
            add(out, s, amp(db + level) * decay(t, t60) * tone)
    return out


def singing():
    """Vibration under tension: the return spring sings thinly and unsteadily while wound tight."""
    out, t = np.zeros((2, N)), np.arange(SR) / SR
    for s, length, db in SINGS:
        shape = swell(length, edge=0.027)
        for hz, level in SPRING:
            flicker = amp(2.7 * wobble(50, size=SR))
            tone = flicker * np.sin(2 * np.pi * hz * t + 0.54 * wobble(168, size=SR))
            add(out, s - .01, amp(db + level - 5.5) * shape * tone[:len(shape)])
    return out


def boot():
    """Sliding friction: the sole slips across the lever in fine, uneven grains."""
    return gains(SCRAPE)[0] * unit(noise(N, SOLE_TONE) * amp(3.1 * wobble(200)))


def yard(x):
    """Diffuse reverberation: walls around the driveway return a faint tail with little bass."""
    hz, t, z = signal.stft(rng.standard_normal((2, SR)), SR, nperseg=256)
    balance = amp(along([(150, -16.5), (700, -6.0), (4000, -2.5), (10000, 6.5)], hz))
    fade = decay(t, along(YARD, hz)[:, None]) * balance[:, None]
    tail = signal.istft(z * fade, SR, nperseg=256)[1]
    tail = tail / np.linalg.norm(tail[0])
    tail = np.pad(tail, ((0, 0), (int(0.02 * SR), 0)))  # 20 ms before the first return
    return signal.fftconvolve(x.mean(axis=0)[None], tail, axes=1)[:, :N]


def scene():
    """Superposition of sources: the engine central, its metal and intake slightly left, all echoed by the yard."""
    around = surroundings() + glove() + squeal() + bird()
    engine = gears() + exhaust()
    metal = knocks() + intake() + lever_stop() + clatter() + ratchet() + after_ring() + singing() + boot()
    bike = engine + metal * amp([[1], [-1]])
    return bike + amp(-16) * yard(bike) + around


def record(dry):
    """Soft saturation and band limiting: round off the highest peaks and keep nothing above TOP_HZ."""
    x = dry / (1 + np.abs(dry) ** 8) ** (1 / 8)
    m = next_fast_len(N + SIZE)
    passband = np.fft.rfftfreq(m, 1 / SR) < TOP_HZ
    return irfft(rfft(x, m) * passband, m)[:, :N]


dry = scene()
out = record(dry)
file_out(out)
```